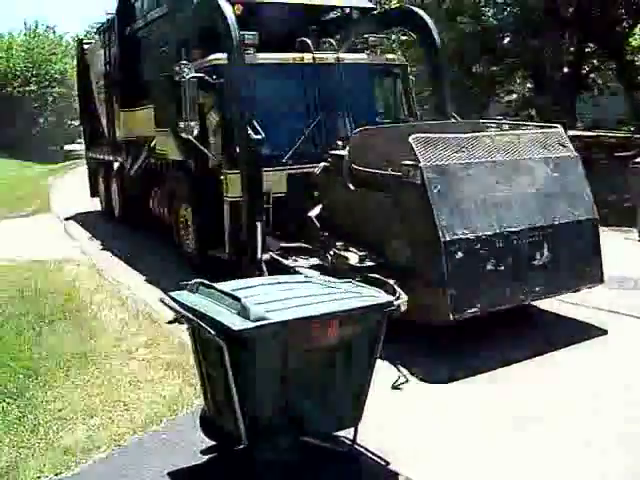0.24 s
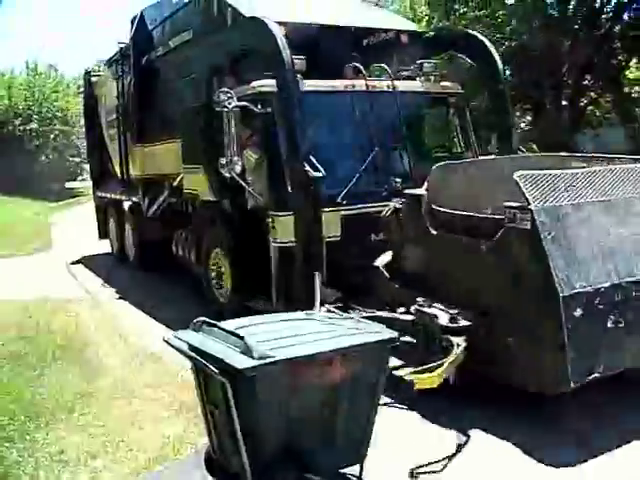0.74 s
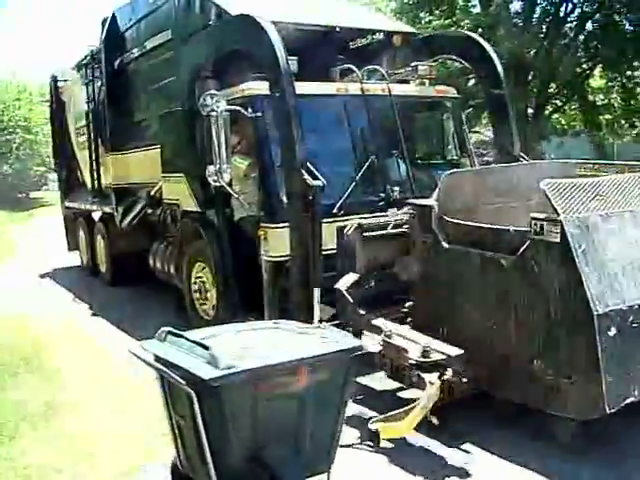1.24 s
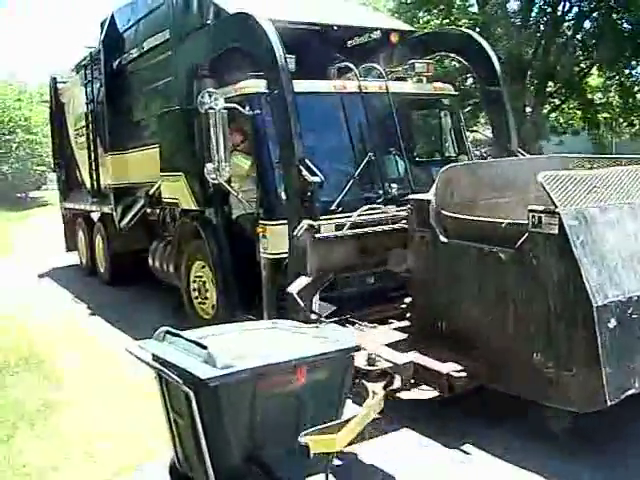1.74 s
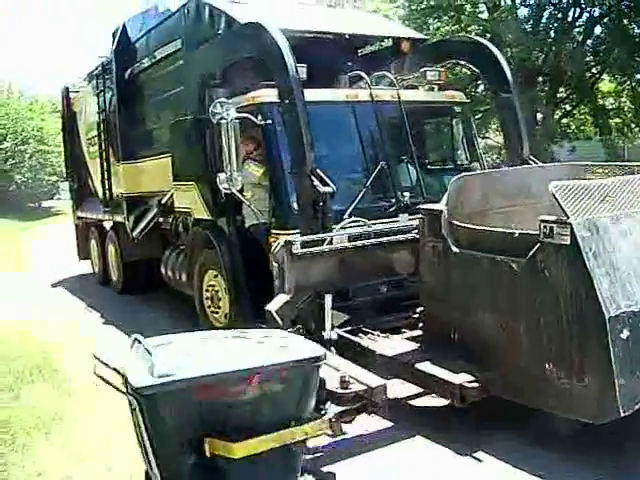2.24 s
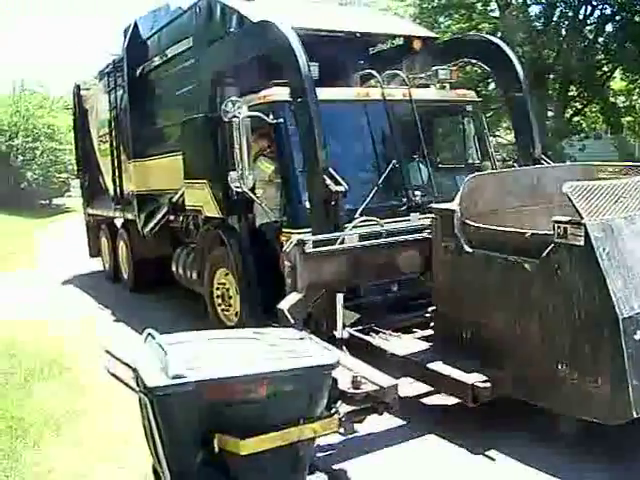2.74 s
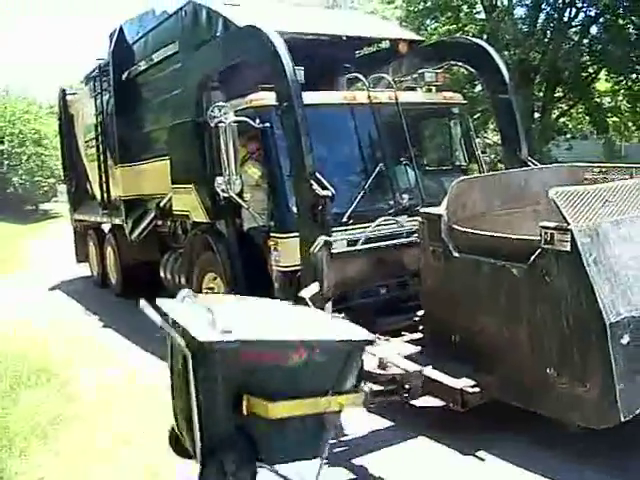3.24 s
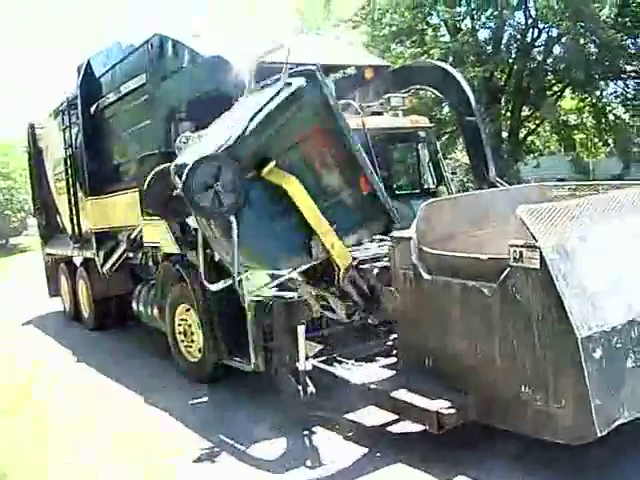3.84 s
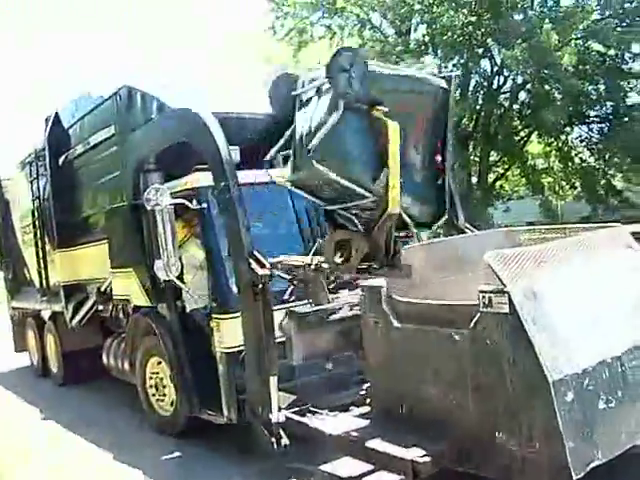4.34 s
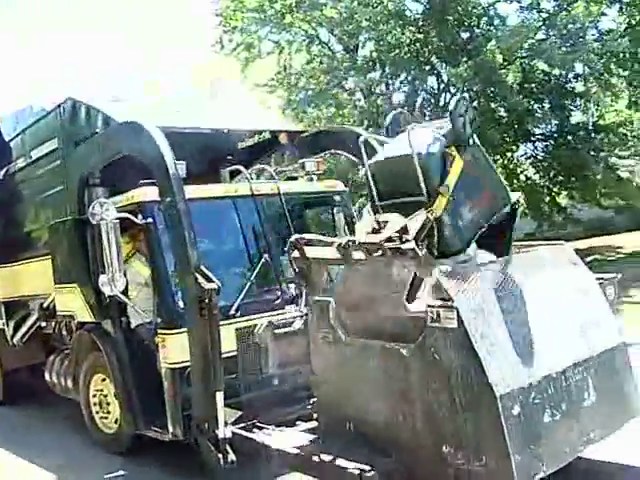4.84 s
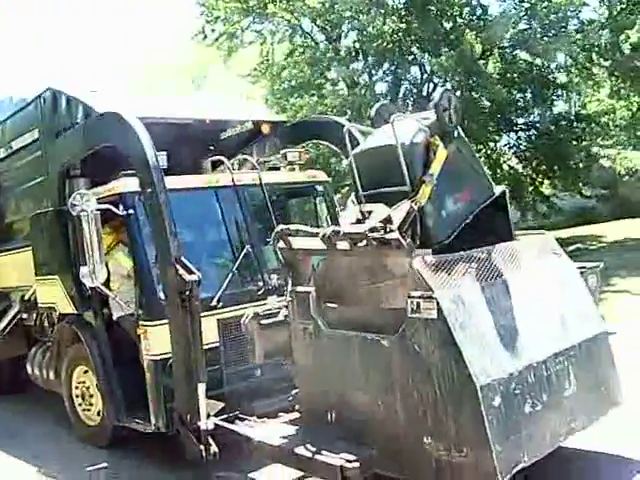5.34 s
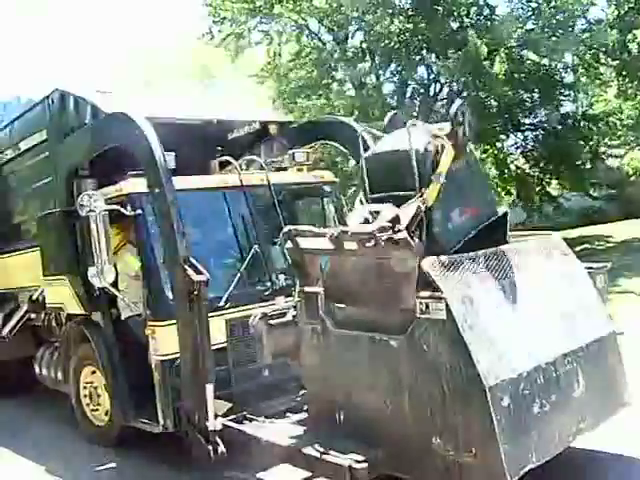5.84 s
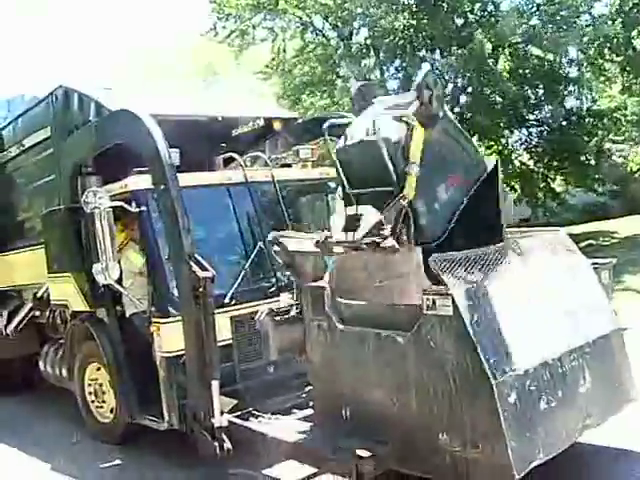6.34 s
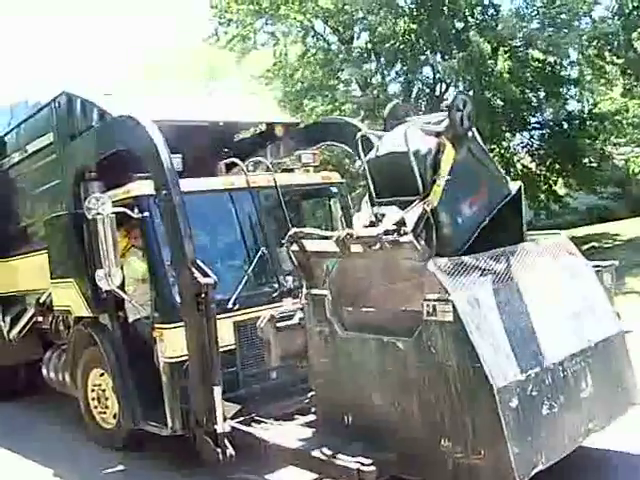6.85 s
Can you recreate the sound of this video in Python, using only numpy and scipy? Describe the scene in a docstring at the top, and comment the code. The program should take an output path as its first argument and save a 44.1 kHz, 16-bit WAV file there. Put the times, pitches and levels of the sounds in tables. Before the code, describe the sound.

A garbage truck rolls to a stop close by, brakes moaning low and squealing high with a brief air hiss and a flurry of clanks. The diesel throbs steadily, surging a few times. A hydraulic whine comes and goes as the arm grabs and lifts a plastic cart, then sharp steel clanks and hollow thuds burst out while it is shaken over the hopper. Outdoor street, faint short echo, small slightly dull microphone.

```python
"""A refuse truck brakes at the curb with a moan and a squeal, then idles while its hydraulic arm handles
a plastic cart. The diesel is a row of exhaust tones under puffing noise; the overall level of the engine
sound rises and falls. The pump whines in step with the engine. Clanks are noise ringing steel, thuds are
low damped notes. The street echoes the knocks faintly; a small microphone with a notch near 4 kHz hears it."""
import sys
import numpy as np
from scipy import signal
from scipy.io import wavfile
from scipy.ndimage import uniform_filter1d

SR = 44100
rng = np.random.default_rng(int(sys.argv[2]) if len(sys.argv) > 2 else 0)


def persist_wave(psi):
    """Save psi, clipped to +-1, as 16-bit WAV."""
    counts = np.round(np.clip(psi, -1, 1) * 32767).astype(np.int16)
    wavfile.write(sys.argv[1], SR, np.atleast_2d(counts).T)


def magnitude_from_level(level_db):
    """Linear magnitude for a level in decibels (20 dB per decade)."""
    exponent = np.asarray(level_db, float) / 20
    return 10 ** exponent


N = 313551  # samples, about 7.1 s


def evened(x):
    """Scales to rms 1."""
    return x / np.sqrt(np.mean(x ** 2) + 1e-20)


def read(points, hz):
    """Reads a spectrum on a log-frequency axis."""
    f, value = np.transpose(points)
    return np.interp(np.log(hz + 1), np.log(f + 1), value)


def columns(rows, t):
    """Every column of a curve at the times t."""
    s, *rest = np.transpose(rows)
    return [np.interp(t, s, column) for column in rest]


def add(mix, start_s, sound):
    """Mixes a sound in at its start, cut off at the end of the mix."""
    part = mix[round(start_s * SR):][:len(sound)]
    part += sound[:len(part)]


def band(x, lo_hz, hi_hz):
    """Band-pass."""
    return signal.sosfilt(signal.butter(3, [lo_hz, hi_hz], "band", fs=SR, output="sos"), x)


def drift(size, hz):
    """Slow random wander of rms 1: noise averaged twice over 1/hz seconds."""
    width = max(int(SR / hz), 1)
    return evened(uniform_filter1d(uniform_filter1d(rng.standard_normal(size), width), width))


def tone(rows, waver_hz, flutter, flutter_hz):
    """A sine along rows of (start_s, pitch_hz, level_db) that wavers in pitch and flutters in strength."""
    t = np.arange(rows[0][0], rows[-1][0], 1 / SR)
    pitch_hz, level_db = columns(rows, t)
    turns = np.cumsum(pitch_hz + waver_hz * drift(len(t), flutter_hz)) / SR
    strength = evened(1 + flutter * drift(len(t), flutter_hz))
    since_start = t - t[0] + (t[0] == 0)  # a tone that begins at 0 s is already sounding
    until_end = t[-1] - t + .001
    edge = np.minimum(1, np.minimum(since_start, until_end) / .02)
    return t[0], np.sqrt(2) * magnitude_from_level(level_db) * strength * edge * np.sin(2 * np.pi * turns)


# overall level of the engine sound over time: start_s, level_db of the roar, level_db of the bass
OVERALL_LEVEL = [(0, -40, -39.5), (.1, -40.5, -36), (.26, -45, -39.5), (.45, -46.5, -39.5), (.62, -42, -37),
                 (.76, -39.5, -36), (.95, -47.5, -36), (1.3, -48.5, -41), (1.86, -48.5, -42.5),
                 (2.02, -37.5, -32.5), (2.16, -32.5, -29.5), (2.26, -39, -36), (2.4, -44.5, -38),
                 (2.6, -47, -42.5), (3.09, -46.5, -39), (3.3, -46.5, -37), (3.5, -48, -41.5),
                 (4.14, -47, -42), (4.3, -37.5, -32.5), (4.45, -33, -30), (4.65, -37, -29.5),
                 (4.9, -41.5, -35.5), (5.45, -44.5, -42.5), (5.88, -43.5, -36.5), (6.12, -44.5, -40.5),
                 (6.24, -36, -31), (6.4, -36, -30), (6.56, -42, -35), (7.11, -46, -42.5)]
# engine speed: start_s, firing_hz (firings per second)
FIRING_RATE = [(0, 29.9), (.8, 28.16), (1, 29.37), (1.9, 30.88), (2.2, 30.42), (2.62, 32.55), (2.95, 30.64),
               (3.45, 31.15), (3.75, 32.22), (4.12, 31.6), (4.39, 32.3), (4.6, 32.2), (4.9, 31.16),
               (5.62, 31.4), (5.7, 32.76), (5.95, 32.13), (7.11, 32)]
# exhaust tones: multiple of the firing rate, level_db against each other
EXHAUST_TONES = [(1, 1), (1.5, -15.5), (2, -3), (3, -10), (4, -14.5), (5, -30.5), (5.5, -16.5), (6, -15),
                 (6.5, -16.5), (8, -26.5), (10, -30), (12, -19.5)]
# spectrum of the roar of fan, block and street: pitch_hz, level_db per hertz, relative within each layer
ROAR_SPECTRUM = [(15, 14), (40, 22), (100, 12.5), (200, 14.5), (420, 7.5), (560, 2.5), (1000, 1.5),
                 (2000, -3), (3200, -4), (5000, 4), (7500, -2)]


def engine(patchy_db=1.5, knock=0.13, throb_db=6):
    """Exhaust tones at the firing rate over a wide roar that puffs with each firing."""
    t = np.arange(N) / SR
    roar_db, bass_db = columns(OVERALL_LEVEL, t)
    firing_hz, = columns(FIRING_RATE, t)
    hiss_db = -54.5 + 0.91 * (roar_db + 47)  # the hiss follows most of the level changes
    turns = np.cumsum(firing_hz + 0.3016 * drift(N, 6.06)) / SR

    exhaust = np.zeros(N)
    for multiple, level_db in EXHAUST_TONES:
        wandering_db = level_db + 1.5 * drift(N, 4)
        exhaust += magnitude_from_level(wandering_db) * np.sin(2 * np.pi * (multiple * turns + rng.random()))

    # noise painted in time and frequency, with patches that come and go
    frames, hz = N // 256 + 5, np.fft.rfftfreq(1024, 1 / SR)
    real, imaginary, patches = rng.standard_normal((frames, 513, 3)).T
    patches = evened(uniform_filter1d(uniform_filter1d(patches, 10, 0), 12, 1))
    painted = (real + 1j * imaginary) * magnitude_from_level(read(ROAR_SPECTRUM, hz)[:, None] + patchy_db * patches)

    low = np.clip(2.5 - hz / 200, 0, 1)
    high = 1. * (hz > 4200)
    # share of the spectrum, level, and the band in Hz where that level holds
    layers = (low, bass_db, 90, 340), (1 - low - high, roar_db, 600, 3500), (high, hiss_db, 4700, 5500)
    roar = np.zeros(N)
    for share, level_db, lo_hz, hi_hz in layers:
        noise = signal.istft(painted * share[:, None], nperseg=1024, noverlap=768)[1][:N]
        roar += magnitude_from_level(level_db) * noise / np.std(band(noise, lo_hz, hi_hz))
    puffs = evened(1 + knock * np.cos(2 * np.pi * turns))
    return puffs * roar + magnitude_from_level(bass_db + throb_db) * evened(exhaust)


# pump whine, heard while the arm works: start_s, level_db
PUMP_LEVEL = [(2.55, -69), (2.68, -36.5), (2.8, -60), (2.95, -41.5), (3.05, -73), (3.45, -62), (3.58, -45),
              (4.12, -46), (4.39, -33.5), (4.78, -36), (4.9, -46), (5.62, -48.5), (5.72, -37.5),
              (5.95, -42), (6.5, -35.5), (6.7, -52), (6.9, -43.5), (7.11, -38.5)]


def pump():
    """Whine of the hydraulic pump, geared to the engine at 12 strokes per firing."""
    t = np.linspace(PUMP_LEVEL[0][0], PUMP_LEVEL[-1][0], num=400)
    pitch_hz = 12 * columns(FIRING_RATE, t)[0]
    rows = np.transpose([t, pitch_hz, columns(PUMP_LEVEL, t)[0]])
    return tone(rows, waver_hz=1.34, flutter=0.18, flutter_hz=25.2)


# low moan while the truck rolls to a stop: start_s, pitch_hz, level_db
MOAN_LINE = [(0, 461.4, -36), (.15, 461, -31), (.25, 461, -38.5), (.46, 460, -41), (.55, 444.6, -33),
             (.68, 443, -31.5), (.76, 440, -50), (.82, 445, -26.5)]
# octave of the moan: start_s, pitch_hz, level_db
OCTAVE_LINE = [(0, 922, -47), (.11, 922, -47), (.18, 921, -30), (.24, 938, -39), (.28, 945, -56)]


def brake_moan():
    """Low moan of the brakes and its octave, both nearly steady in pitch."""
    return [tone(rows, waver_hz=1.34, flutter=0.18, flutter_hz=25.2) for rows in (MOAN_LINE, OCTAVE_LINE)]


def swelling_note(start_s, length_s, pitch_hz, peak_db):
    """Rows of a short tone of steady pitch that swells and fades around its middle."""
    t = np.linspace(max(start_s, 0), start_s + length_s, num=20)
    swell_db = np.interp((t - start_s) / length_s, [0, .25, .5, .75, 1], [-27.5, -3, 0, -3, -27.5])
    return np.transpose([t, pitch_hz + 0 * t, peak_db + swell_db])


# brake squeal, before the trim in brake_squeal(): start_s, pitch_hz, level_db
SQUEAL_LINE = [(0, 6540, -24), (.1, 6515, -24), (.25, 6600, -36), (.3, 6620, -30), (.4, 6540, -34),
               (.5, 6510, -44), (.74, 6620, -37), (.92, 6590, -46), (1.07, 6600, -41), (1.18, 6630, -38),
               (1.28, 6665, -41), (1.35, 6680, -50), (1.46, 6660, -57)]
# shorter partials, before the same trim: start_s, length_s, pitch_hz, peak_db, roughness (0-1)
SQUEAL_PARTIALS = [(-.12, .34, 6390, -34, .5), (-.2, .45, 5670, -40, .4), (.26, .39, 5660, -31, .3),
                   (1.1, .38, 6430, -48, .1), (1.28, .32, 6547, -45, .1)]


def brake_squeal():
    """Stick-slip of the brakes: a rough, beating high line and shorter partials around it."""
    squeal = np.zeros(N)
    add(squeal, *tone(SQUEAL_LINE, waver_hz=18, flutter=.65, flutter_hz=170))
    for *row, rough in SQUEAL_PARTIALS:
        add(squeal, *tone(swelling_note(*row), waver_hz=28 * rough, flutter=rough, flutter_hz=120))
    return magnitude_from_level(-1.5) * squeal


def air_brake(start_s=0.055, length_s=0.25, peak_db=-35):
    """Puff of the air brake: a short bright hiss that rises and falls."""
    t = np.arange(0, length_s, 1 / SR)
    hiss = evened(band(rng.standard_normal(len(t)), 2000, 8400))
    return start_s, magnitude_from_level(peak_db) * np.sin(np.pi * t / length_s) ** 2 * hiss


# ringing of the steel arm: pitch_hz, level_db against each other, t60_s (time to fall 60 dB)
STEEL_MODES = [(830, -4, .05), (1210, -4, .05), (1430, -3, .04), (1600, -2, .04), (2050, -2, .04),
               (2400, -2, .03), (2680, -3, .04), (3170, -3, .03), (5050, -3, .03), (5870, -2, .03),
               (6230, -1, .03), (6500, -2, .03), (6770, -2, .03), (6970, -3, .03)]


def clank(start_s, level_db, ring_hz, treble_db, t60_s):
    """A dying rattle of noise rings the steel modes and, briefly, the part that is hit."""
    t = np.arange(int(.3 * SR)) / SR
    t60_s = max(t60_s, .01)
    fall = magnitude_from_level(-60 * t / t60_s) + 0.069 * magnitude_from_level(-60 * t / 0.53)  # with a faint long tail
    shape = (1 - np.exp(-t / (0.0093 * t60_s))) * fall
    rattle = rng.standard_normal(len(t)) * shape

    modes = np.zeros(len(t))
    for mode_hz, mode_db, mode_t60_s in STEEL_MODES:
        share_db = 2 * rng.standard_normal()  # each blow lands on another spot
        modes += magnitude_from_level(share_db + mode_db - 60 * t / mode_t60_s) * np.sin(2 * np.pi * mode_hz * t)
    hit_part = magnitude_from_level(-60 * t / .018) * np.sin(2 * np.pi * ring_hz * t)
    steel, part = (evened(signal.fftconvolve(rattle, m)[:len(t)]) for m in (modes, hit_part))

    bright = signal.lfilter([1, -.7], 1, rattle)  # hard contact leans bright
    middle = evened(band(bright, 900, 4100)) + .35 * band(steel, 700, 4100) + .55 * part
    treble = evened(band(bright, 4200, 7600)) + .5 * band(steel, 4200, 7600)
    body = band(rattle * (1 - np.exp(-t / .008)), 300, 1000)  # slower to rise
    blow = evened(middle) + magnitude_from_level(treble_db) * evened(treble) + magnitude_from_level(-6) * evened(body)
    return start_s, magnitude_from_level(level_db - 6.0) * np.sqrt(np.mean(shape ** 2)) * blow


# clanks of arm, cart and hopper: start_s, level_db (before the trim in clank()), ring_hz (loudest ring),
# treble_db (against the middle), t60_s
CLANK_EVENTS = [(.396, -23, 3153, 5.5, 0.05), (0.4393, -29.5, 2970, 2, .1), (.4888, -31.5, 2800, 2, 0.11),
                (0.5294, -19.5, 1820, -6.5, 0.058), (.588, -19, 2340, 3.5, 0.093),
                (0.6295, -26, 2670, -21, .055), (.6694, -31, 2470, 8, .12),
                (0.7477, -18.5, 1310, 1.5, 0.094), (.77, -22, 1070, -8, 0.084),
                (.785, -26.5, 1700, -6, .08), (0.7973, -21, 2320, -4, 0.054),
                (.842, -27.5, 2270, -7, 0.081), (0.9203, -26.5, 1420, -2.5, 0.17),
                (0.9934, -30.5, 3010, -22, .08), (1.037, -37, 2610, 7, .057), (1.1218, -43, 1100, 8.5, .05),
                (1.8306, -21, 3320, 1, 0.038), (1.8715, -26.5, 1530, -2.5, 0.15),
                (1.9842, -24.5, 3045, 1, .088), (2.034, -16.5, 2760, 5, 0.043),
                (2.1956, -12.5, 2080, 7.5, 0.041), (2.3147, -27.5, 1730, 3, 0.036),
                (2.4043, -28, 1920, -21, 0.074), (2.8273, -33, 1058, 1.5, 0.13),
                (3.123, -23, 1376, -2.5, 0.1), (3.1357, -23, 1400, 3.5, .08),
                (3.1481, -11.5, 1836, -14.5, 0.062), (4.536, -20, 1800, -0.5, 0.069),
                (4.544, -15, 1740, -0.5, .069), (4.7589, -16.5, 1630, -8, .092),
                (4.7949, -16, 2186, -3, .15), (4.81, -22, 2100, -7.5, .08), (4.8313, -13, 2500, -28, .039),
                (4.9724, -10, 2490, 0, 0.054), (5.0711, -20.5, 3080, 13, 0.067),
                (5.0935, -20.5, 1070, -11, 0.087), (5.2001, -30.5, 1193, -21, 0.13),
                (5.2394, -27, 1750, 1, 0.1), (5.4352, -43.5, 1206, 14, 0.036),
                (5.5209, -22.5, 2020, 7.5, 0.023), (5.526, -25.5, 1500, -10, .08),
                (5.713, -20, 2320, -4.5, 0.03), (5.7902, -28.5, 2315, -20, .08),
                (5.812, -29, 1040, -0.5, 0.28), (5.8684, -19, 960, -12, 0.035),
                (5.909, -20.5, 1960, -7.5, 0.046), (6.2234, -17.5, 2070, -2.5, 0.098),
                (6.2328, -10.5, 1720, -20, 0.035), (6.3833, -11, 1750, -7.5, 0.036),
                (6.4168, -15, 1080, -6, .21), (6.4386, -13, 2486, -2, 0.069), (6.495, -27, 3220, -20, .07),
                (6.7341, -18.5, 1676, -8.5, 0.11), (6.762, -17, 1610, -4, 0.061)]


def arm_clanks():
    """The arm, cart and hopper strike steel, blow by blow."""
    return [clank(*row) for row in CLANK_EVENTS]


def thud(start_s, level_db, pitch_hz, t60_s):
    """A hollow wall answers a soft push with a low damped note and a puff."""
    t = np.arange(int(.4 * SR)) / SR
    fall = (1 - np.exp(-t / 0.0018)) * magnitude_from_level(-60 * t / max(t60_s, .02))
    puff = evened(band(rng.standard_normal(len(t)), 69, 500))
    return start_s, magnitude_from_level(level_db - 6.5) * fall * (np.sin(2 * np.pi * pitch_hz * t) + .5 * puff)


# hollow thuds of cart and hopper: start_s, level_db (before the trim in thud()), pitch_hz, t60_s
THUD_EVENTS = [(0.3, -23.5, 75.4, 0.15), (0.546, -15, 63, .067), (.798, -19.5, 60.6, .23),
               (0.952, -21, 74.5, 0.12), (2.098, -15.5, 67, 0.11), (2.257, -18, 81, 0.31),
               (2.85, -21.5, 75, 0.16), (3.156, -24.5, 425.6, 0.36), (3.159, -26, 490, 0.32),
               (3.199, -21, 107.6, 0.35), (4.773, -12.5, 81.8, .15), (4.98, -20, 417.6, 0.3),
               (5, -18.5, 61.2, 0.28), (5.833, -9, 187, 0.082), (5.871, -14.5, 61.3, 0.24),
               (5.953, -15.5, 267, 0.21), (6.24, -22, 59.7, 0.18), (6.361, -17, 131, .2),
               (6.489, -17.5, 61.9, .14), (6.768, -15.5, 67.8, 0.3)]


def cart_thuds():
    """The hollow cart and hopper boom under the clanks."""
    return [thud(*row) for row in THUD_EVENTS]


def loose_rattles(count=20):
    """Small loose parts shake at random moments; their clanks follow the overall level."""
    start_s = rng.uniform(0, N / SR, count)
    level_db = columns(OVERALL_LEVEL, start_s)[0] + 12.5
    ring_hz, treble_db = rng.uniform(1000, 3200, count), rng.uniform(-15, 5, count)
    return [clank(*row, t60_s=0.1) for row in zip(start_s, level_db, ring_hz, treble_db)]


def street(x):
    """Echoes from the truck side, road and houses: sparse random taps that die away."""
    t = np.arange(int(.35 * SR)) / SR
    signs = rng.choice([-1., 1.], len(t))
    present = (rng.random(len(t)) < 2000 / SR) * (t > .006)  # about 2000 taps a second, after 6 ms
    taps = signs * present * magnitude_from_level(-60 * t / 0.053)
    return signal.fftconvolve(x, taps / np.linalg.norm(taps))[:N]


def scene():
    """Truck at the curb: engine, pump, brakes and knocks, with the street echoing the knocks."""
    whine, knocks = np.zeros((2, N))
    for sound in [pump()] + brake_moan():
        add(whine, *sound)
    for sound in [air_brake()] + arm_clanks() + loose_rattles() + cart_thuds():
        add(knocks, *sound)
    return (engine() + whine + brake_squeal() + knocks + magnitude_from_level(-16) * street(knocks))[None]


# colour of the small microphone: pitch_hz, level_db
MIC_COLOUR = [(3000, 1), (3600, -7), (4000, -23), (4200, -27.5), (4500, -19), (5000, -7), (6000, -0.5),
              (6800, 6.5), (7200, -3), (7500, -27.5), (7900, -65.5), (12000, -70)]


def microphone(dry):
    """Colours the sound with a causal minimum-phase filter: a notch near 4 kHz, little above 7.5 kHz."""
    hz = np.abs(np.fft.fftfreq(8192, 1 / SR))
    log_gain = read(MIC_COLOUR, hz) * np.log(10) / 20
    phase = -np.imag(signal.hilbert(log_gain))
    taps = np.fft.ifft(np.exp(log_gain + 1j * phase)).real[:2048]
    return signal.oaconvolve(dry, taps[None])[:, :N]


def band_limit(x):
    """A steep low-pass at the top of the band."""
    return signal.sosfilt(signal.butter(12, 8470, fs=SR, output="sos"), x)


def record(dry):
    """The small microphone hears the truck, and the sharpest blows overload softly."""
    finished = np.tanh(microphone(dry))
    return band_limit(finished)


dry = scene()
out = record(dry)
persist_wave(out)
```